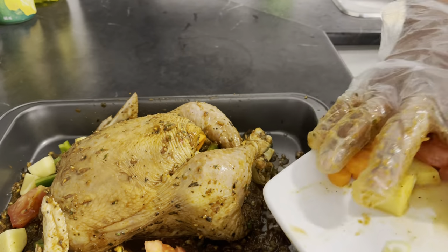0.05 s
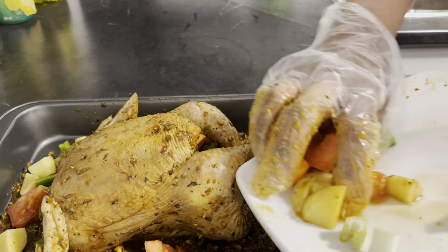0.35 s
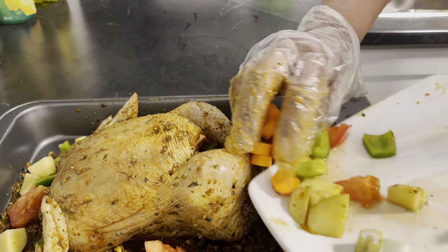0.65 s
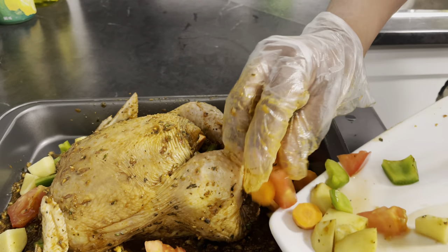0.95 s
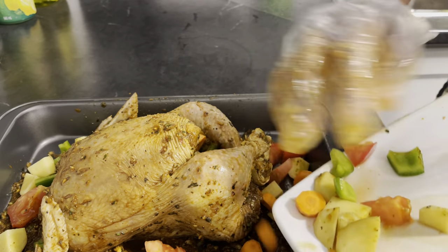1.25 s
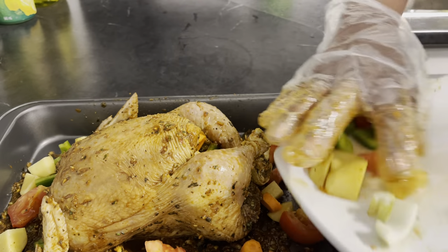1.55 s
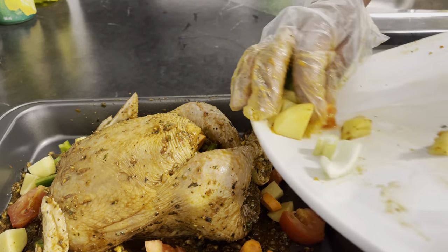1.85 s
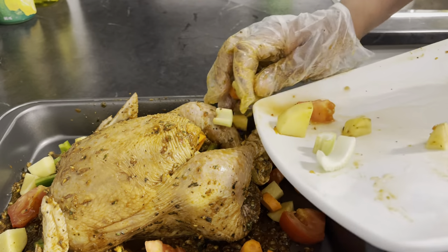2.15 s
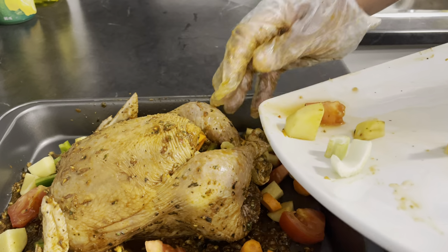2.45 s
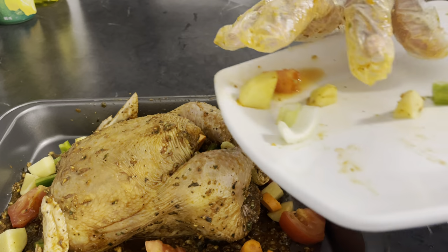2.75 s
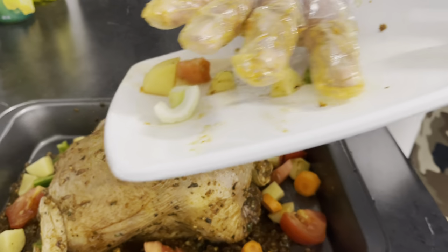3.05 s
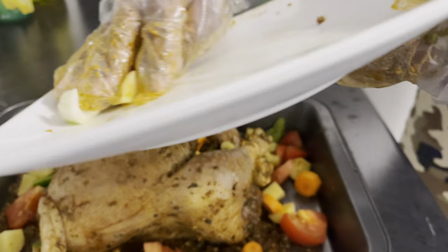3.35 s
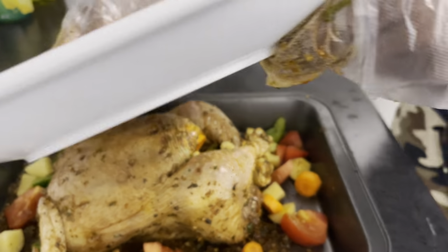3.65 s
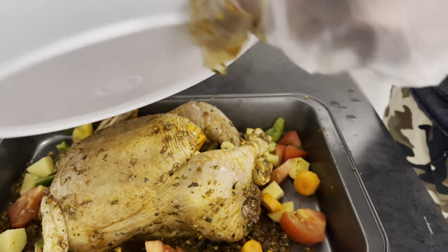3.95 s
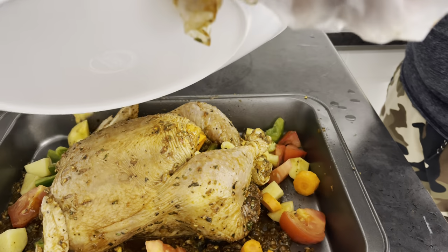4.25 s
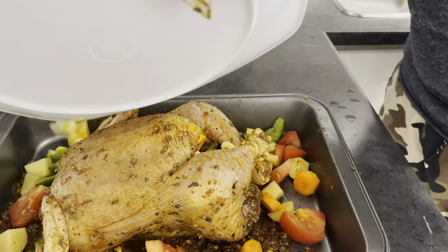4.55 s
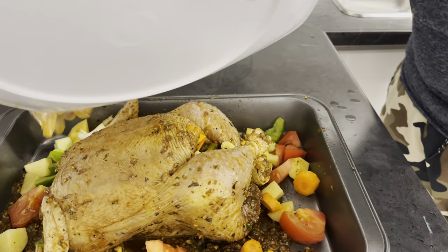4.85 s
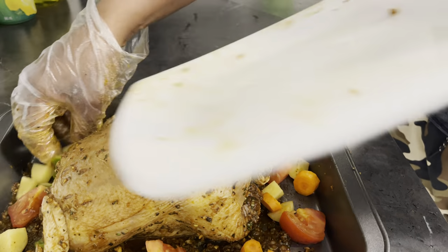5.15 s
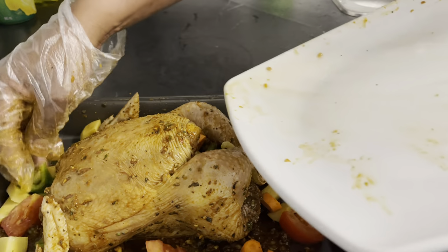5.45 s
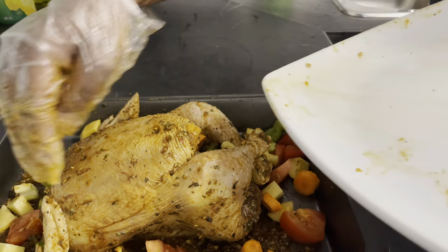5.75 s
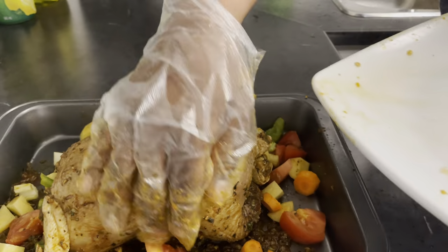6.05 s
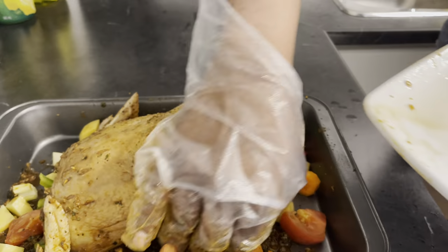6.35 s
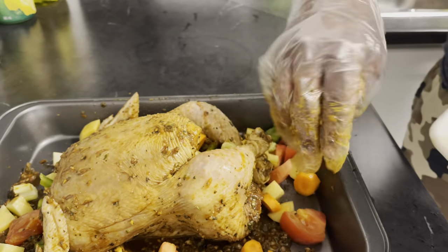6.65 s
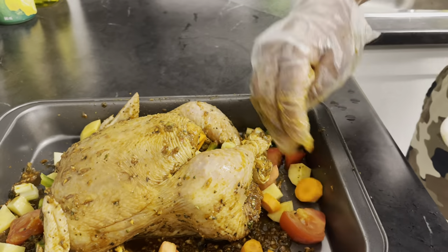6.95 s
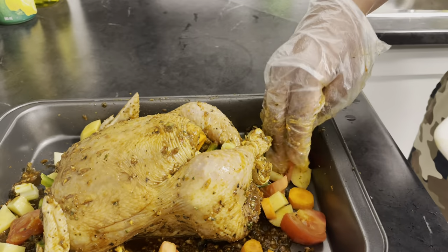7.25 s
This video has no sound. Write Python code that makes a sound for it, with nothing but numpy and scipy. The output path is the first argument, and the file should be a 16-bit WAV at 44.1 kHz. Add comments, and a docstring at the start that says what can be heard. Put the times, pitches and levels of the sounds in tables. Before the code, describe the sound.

Vegetable pieces tap and plop into a loaded metal pan, with a rustling plastic glove, a refrigerator hum and a rushing fan.

```python
"""A hand in a thin plastic glove crinkles throughout, over refrigeration hum and a rushing fan.
From 0.5 to 2.2 s it pushes chopped vegetables off a plate into a metal roasting pan:
each piece lands with a damp knock and a slap, and briefly rings the loaded pan.
Wet fingers drag and the film peels off with small smacks. Near 4 s comes a run of dull bumps
as pieces shift and the pan is nudged; a last few follow near 7 s."""
import sys
import numpy as np
from scipy import signal
from scipy.fft import rfft, irfft
from scipy.io import wavfile

SR = 44100
rng = np.random.default_rng(int(sys.argv[2]) if len(sys.argv) > 2 else 0)


def store_wav(level_fs):
    """Save 16-bit WAV to argv[1]."""
    pcm = np.round(np.clip(np.atleast_2d(level_fs), -1, 1) * 32767)
    wavfile.write(sys.argv[1], SR, pcm.T.astype(np.int16))


N = 326781
TIME, FREQ = np.arange(N) / SR, np.fft.rfftfreq(N, 1 / SR)


def vegetables(rise_cycles=0.33, ring_db=-2, slap_db=3, slap_decay_s=0.012, room_db=-10, softness=5):
    """Each contact gives a damp knock, a wet slap and a pan ring that depends on the spot hit."""
    # modes of the loaded pan: freq_hz, relative_db, t60_s
    pan_modes = [(437, 18.5, 0.04), (711, -6, 0.1), (870, 12, 0.13), (1074, -5, 0.22), (1168, 1, 0.45),
                 (1230, -2, .16), (1370, -15, 0.12), (1406, 8, 0.12), (1600, 4, 0.08), (1778, -5, 0.095),
                 (2090, 1, 0.058), (2140, 8, 0.09), (2350, -11, 0.1), (2570, -2, .07)]
    # spectrum of a wet slap on metal: freq_hz, relative_db
    slap_spectrum = [(60, -13), (200, -8), (500, 6), (1000, 4.5), (1600, 0.5), (2300, -2), (3200, -5),
                     (4000, -11), (5200, 3), (9000, -26)]
    t = TIME[:SR // 2]
    bins_hz = np.fft.rfftfreq(len(t), 1 / SR)
    mode_hz, mode_db, mode_t60_s = np.transpose(pan_modes)[:, :, None]
    mode_gain = amp(mode_db) / np.linalg.norm(amp(mode_db))
    modes = mode_gain * np.exp((2j * np.pi * mode_hz - np.log(1000) / mode_t60_s) * t)
    slap_colour = unit(amp(read(slap_spectrum, bins_hz)))
    lag_s = np.array([[0], [.0002]])  # left, right
    dry = np.zeros((2, N))
    for start_s, knock_db, pitch_hz, t60_s, clack_db, top_hz, balance_db in contacts():
        swell = (1 - np.exp(-t * pitch_hz / rise_cycles)) ** 2 * np.exp(-np.log(1000) * t / t60_s)
        knock = amp(knock_db) * swell / swell.max() * np.sin(2 * np.pi * pitch_hz * (t - lag_s))
        spot = np.exp(2j * np.pi * rng.random((2, len(pan_modes))))
        spot /= np.hypot(1, (mode_hz.T / top_hz) ** softness)  # soft flesh excites little above top_hz
        ring = amp(ring_db) * (spot @ modes).real
        splat = rfft(rng.standard_normal((2, len(t)))) * slap_colour
        splat /= np.hypot(1, (bins_hz / top_hz) ** softness)
        slap = amp(slap_db) * irfft(splat, len(t)) * np.exp(-t / slap_decay_s)
        clack = amp(clack_db) * (ring + slap) * (1 - np.exp(-t * top_hz))
        add(dry, start_s, sides(balance_db) * (knock + clack))
    return dry + amp(room_db) * room(dry)


def contacts(flop_s=.012, flop_db=-24, flop_ratio=0.56, bump_t60_s=0.051, bump_balance_db=3.5):
    """Every touch on the pan: pieces land, then flop over softer and lower; bumps barely stir it."""
    # pieces landing: start_s, knock_db, pitch_hz, t60_s, clack_db, top_hz, left_right_db
    landings = [ (.4583, -33, 2280, 0.016, -23, 3300, -1), (0.4607, -29, 2680, .016, -31, 4400, -4),
                (0.4584, -18, 1350, 0.022, -25.5, 2400, 6), (.461, -15.5, 843, 0.045, -37, 2200, 9.5),
                (0.4644, -19.5, 1760, 0.025, -28, 2800, 4), (.4765, -38, 595, 0.029, -42, 2500, -2),
                (.548, -23.5, 530, 0.025, -34, 1200, 4), (.661, -35, 870, 0.043, -31, 1000, 10),
                (.6775, -21, 1320, .035, -22.5, 2000, 4.5), (.678, -27, 2070, 0.021, -30.5, 2450, 4),
                (.6815, -24, 900, 0.037, -35, 1186, 6), (.722, -27, 903, 0.045, -38, 1300, 8),
                (.733, -18.5, 886, 0.067, -30, 1300, -2), (0.7357, -27, 1123, 0.055, -32.5, 1570, 3),
                (.773, -39, 1060, 0.054, -39, 1700, 5), (.957, -41, 930, .047, -39, 1604, 3),
                (1.1743, -21.5, 1179, 0.095, -35, 1250, 2), (1.176, -36.5, 2370, .018, -49, 2600, 20),
                (1.178, -21.5, 660, .04, -32, 1050, 6), (1.1805, -19, 854, 0.03, -27, 1180, 6),
                (1.229, -29.5, 940, 0.026, -32, 1200, 10), (1.2378, -25, 574, 0.016, -53, 1200, 8),
                (1.479, -37, 595, 0.056, -40, 1610, 6), (2.129, -28, 433, 0.049, -47, 900, 5),
                (2.146, -36, 2510, .024, -38, 3200, 10), (2.1479, -25.5, 570, 0.043, -28.5, 1410, 2),
                (2.148, -33, 1370, 0.028, -44, 1600, 2), (2.166, -32, 800, 0.032, -41, 1700, 3),
                (2.2065, -37, 790, 0.014, -36, 1500, 0), (2.2155, -27.5, 610, 0.022, -52, 1500, 0),
                (4.086, -35, 392, 0.15, -39, 1290, 6), (4.097, -52, 1200, 0.031, -46, 1300, 0)]
    # pieces shifting, hand and plate nudging the pan: start_s, level_db, pitch_hz
    bumps = [ (0.475, -25, 190), (.557, -28.5, 324), (0.584, -30.5, 62), (0.68, -24, 197), (0.705, -36, 64),
             (1.185, -31, 394), (1.248, -30, 196), (1.855, -40, 80), (2.136, -30, 198), (2.17, -33, 218),
             (2.225, -31, 428), (3.841, -24.5, 166), (3.862, -26.5, 191), (3.882, -32.5, 585),
             (3.891, -19.5, 196), (3.905, -33, 363), (3.948, -28, 198), (3.98, -29, 205), (4.056, -39, 400),
             (4.206, -38, 390), (4.545, -31.5, 455), (4.549, -25.5, 203), (5.235, -36.5, 214),
             (7.024, -35, 452), (7.05, -25, 322), (7.054, -21, 190), (7.081, -31, 300)]
    for start_s, knock_db, pitch_hz, t60_s, clack_db, top_hz, balance_db in landings:
        yield start_s, knock_db, pitch_hz, t60_s, clack_db, top_hz, balance_db
        yield (start_s + flop_s, knock_db + flop_db, pitch_hz * flop_ratio, t60_s,
               clack_db + flop_db, top_hz * flop_ratio, balance_db)
    for start_s, level_db, pitch_hz in bumps:
        clack_db, top_hz = level_db - 4, pitch_hz * 2.04
        yield start_s, level_db, pitch_hz, bump_t60_s, clack_db, top_hz, bump_balance_db


def glove(gain_db=2, creases_per_s=5000, spread_db=3, wash=0.9,
          folds_per_s=250, fold_decay_s=0.006, clumping=0.26, crossover_hz=7000):
    """Wet film rubs softly while tiny creases buckle in clumps; a few snap loudly."""
    # single creases snapping over: start_s, drive_db
    snaps = [(.251, -17), (.784, -17), (1.149, -15), (1.319, -17), (2.390, -19), (2.492, -13.5),
             (3.011, -18), (3.196, -17), (3.567, -19), (3.694, -17), (4.103, -16), (4.914, -15),
             (5.450, -18), (5.761, -17), (5.783, -16), (5.941, -13), (6.465, -16), (6.904, -18),
             (7.307, -18)]
    # spectrum of the film: freq_hz, relative_db
    film_spectrum = [(500, -17), (1500, -6.5), (2100, -5), (2600, -4), (3100, -4.5), (4000, -7.5),
                     (5800, -4.5), (7200, -6.5), (8500, -6), (9400, 0.5), (11200, 4), (12400, -6),
                     (13200, -32), (13800, -21), (15800, -31)]
    # film's stereo balance: freq_hz, left_right_db
    film_balance = [(2000, 0.5), (4000, 3), (5800, 9), (7100, 4), (7900, 3.5), (9000, 0)]
    # film's left-right likeness: freq_hz, correlation
    film_likeness = [(2000, 0.13), (7000, 0.027), (8300, 0.74), (8800, 1), (10200, 1), (11200, 1),
                     (13000, 1)]
    # lag of the left channel: freq_hz, lag_cycles
    left_lag = [(8700, 0.028), (9800, 0.47), (10350, 0.55), (11800, 0.92)]
    work_db, crisp_db = glove_work()
    effort, tilt = amp(work_db + gain_db), amp(crisp_db / 2)
    sizes = amp(spread_db * np.minimum(rng.exponential(1, (2, N)), 5))
    creases = unit(sizes * rng.choice([-1, 1], (2, N)) * (rng.random((2, N)) < creases_per_s / SR))
    # a fold giving way sets off a dying run of creases
    folds = rng.exponential(1, N) * (rng.random(N) < folds_per_s / SR)
    runs = signal.lfilter([1], [1, -np.exp(-1 / (fold_decay_s * SR))], folds)
    clumps = unit(1 + clumping * runs)
    crinkle = unit(creases + wash * rng.standard_normal((2, N))) * clumps * effort * tilt
    rub = rng.standard_normal((2, N)) * np.sqrt(clumps) * effort / tilt
    for start_s, drive_db in snaps:
        add(crinkle, start_s, amp(drive_db) * np.array([[1], [.5]]))
    rub_share = 1 / (1 + (FREQ / crossover_hz) ** 4)
    spectrum = stereo_spectra(rub, film_likeness) * np.sqrt(rub_share)
    spectrum += stereo_spectra(crinkle, film_likeness) * np.sqrt(1 - rub_share)
    spectrum *= unit(amp(read(film_spectrum, FREQ))) * sides(read(film_balance, FREQ))
    spectrum[0] *= np.exp(-2j * np.pi * read(left_lag, FREQ))
    return irfft(spectrum, N)


def glove_work(fidget_hz=26, fidget_db=1, rest_db=-3.5, idle_crisp_db=-0.6):
    """The hand's effort on the film and its crispness (crinkle over rub), both in dB."""
    # steady handling: time_s, effort_db
    grip = [(0, -41.5), (.85, -43), (1, -45), (1.5, -43), (2, -44), (2.2, -46.5), (3.1, -45.5), (3.35, -45),
            (4.25, -44.5), (4.55, -49), (5.1, -44.5), (6.8, -46.5), (7.1, -47.5), (7.41, -47.5)]
    # hand holding still: start_s, length_s
    rests = [(1.345, 0.046), (2.07, 0.16), (4.492, 0.058), (5.62, 0.16), (6.902, 0.096)]
    # fingers flexing or sweeping: start_s, length_s, effort_db, crisp_db
    strokes = [ (1.086, 0.13, -43, 2.5), (1.197, 0.11, -41, 3), (1.38, 0.048, -41, -3),
               (1.575, 0.05, -44, -1), (2.718, 0.24, -42.5, 1), (3.167, 0.083, -43, 2),
               (3.213, 0.31, -44, 0.5), (4.717, .04, -48, 1), (4.907, 0.045, -45.5, 8),
               (4.983, 0.13, -45.5, -0.5), (5.394, 0.12, -43.5, 2), (5.746, .06, -59, 5),
               (5.854, 0.085, -45, 7), (5.967, 0.087, -40.5, 4.5), (6.037, 0.073, -46, 0),
               (6.21, 0.088, -42, -1.5), (6.404, 0.23, -47.5, 2.5), (6.662, 0.15, -43.5, -0.5),
               (6.976, 0.079, -42, 0), (7.265, 0.064, -46, -1)]
    grip_db = np.interp(TIME, *np.transpose(grip)) + fidget_db * drift(fidget_hz)
    stillness = sum(movement(*rest) for rest in rests)
    power = amp(grip_db + rest_db * stillness) ** 2
    crisp_db = np.full(N, idle_crisp_db)
    for start_s, length_s, effort_db, stroke_crisp_db in strokes:
        swell = movement(start_s, length_s)
        power += amp(effort_db) ** 2 * swell
        crisp_db += (stroke_crisp_db - crisp_db) * swell
    return 10 * np.log10(power), crisp_db


def movement(start_s, length_s, taper_share=0.52):
    """Envelope of one hand movement, 0 to 1: swell, hold, fade."""
    edge = np.minimum(TIME - start_s, start_s + length_s - TIME) / (taper_share * length_s / 2)
    return np.sin(np.pi / 2 * np.clip(edge, 0, 1)) ** 2


def smacks(width_hz=4200, rise_s=0.00052, decay_s=0.0066, spread_db=4, balance_db=5):
    """Wet film peels off food and skin in a quickly dying run of tiny pops."""
    # wet patches letting go: start_s, level_db, centre_hz
    peels = [(.282, -42, 4500), (1.537, -44, 5000), (1.703, -41, 5000), (2.491, -46, 5000),
             (3.418, -43, 5000), (5.447, -41, 4800), (2.564, -44, 4500), (4.068, -45, 4500),
             (4.488, -42.5, 4500), (4.752, -42, 4500), (5.271, -43, 4500), (6.463, -43, 4500),
             (7.204, -45, 4600), (7.304, -45, 5000)]
    out, t = np.zeros((2, N)), TIME[:SR // 20]
    bins_hz = np.fft.rfftfreq(len(t), 1 / SR)
    swell = (1 - np.exp(-t / rise_s)) * np.exp(-t / decay_s)
    for start_s, level_db, centre_hz in peels:
        pops = rng.standard_normal((2, len(t)))
        pops *= amp(spread_db * np.minimum(rng.exponential(1, len(t)), 4))
        wet = unit(irfft(rfft(pops) * resonance(bins_hz, centre_hz, width_hz), len(t)))
        add(out, start_s, amp(level_db) * sides(balance_db) * wet * swell / swell.max())
    return out


def wipes():
    """Wet fingers drag over plate and pan: friction noise in one resonance of the surface."""
    # finger drags: start_s, length_s, level_db, centre_hz, width_hz
    drags = [(1.37, 0.07, -49, 1700, 1300), (1.67, 0.093, -51, 1700, 1200), (2.722, 0.2, -51, 1920, 1000),
             (3.178, 0.26, -52.5, 1310, 190), (6.201, .1, -52, 1600, 1100), (6.683, 0.23, -54, 2600, 560),
             (6.996, 0.1, -47.5, 1400, 1000)]
    out = np.zeros((2, N))
    for start_s, length_s, level_db, centre_hz, width_hz in drags:
        size = round(length_s * SR)
        surface = resonance(np.fft.rfftfreq(size, 1 / SR), centre_hz, width_hz)
        friction = irfft(rfft(rng.standard_normal((2, size))) * surface, size)
        add(out, start_s, amp(level_db) * unit(friction) * signal.windows.tukey(size, .8))
    return out


def fridge_hum(waver_hz=4.0):
    """Refrigeration motor tones that waver in strength and phase."""
    # motor tones: freq_hz, level_db, left_right_db, unsteadiness
    tones = [(60.2, -71.5, 4, 0), (91.8, -61, 4, 0.4), (111.5, -55, 0, 0.05), (119.96, -36.5, 4, 0.06),
             (147.8, -42.5, 4.5, 0.29), (140, -48.5, 3.5, 0.74), (177, -58, 11, 1), (363, -60, -11, 0),
             (411, -63.5, 6, 0.96), (525.6, -68, 20.5, 0.3)]
    out = np.zeros((2, N))
    for freq_hz, level_db, balance_db, unsteadiness in tones:
        waver = 1 + unsteadiness * (drift(waver_hz) + 1j * drift(waver_hz))
        tone = (waver * np.exp(2j * np.pi * freq_hz * TIME)).real
        out += amp(level_db) * sides(balance_db) * unit(tone)
    return out


def fan(level_db=-40.5):
    """Rushing air, coloured by the duct and the room."""
    # spectrum of the air: freq_hz, relative_db
    air_spectrum = [(20, -26), (36, -6), (50, 1), (100, 9), (190, 1.5), (280, -3), (450, -1), (700, -7.5),
                    (1100, -13), (1700, -19), (2500, -29), (4000, -18.5), (9000, -23.5), (15000, -100)]
    # duct and room peaks and dips: centre_hz, width_hz, lift_db
    duct = [(219, 9.6, -18), (247, 29, 5.5), (441, 53, -4.5), (477, 61, 3), (849, 97, 19), (936, 43, 10.5),
            (1250, 170, -3.5), (1280, 52, -3), (1567, 116, 8.5), (1705, 27, 12.5), (2330, 200, 15.5),
            (2600, 52, 9)]
    # air's left-right likeness: freq_hz, correlation
    air_likeness = [(30, .98), (160, 0.37), (300, 0.63), (500, 0.066), (850, 0.38), (1200, 0), (4000, 0.03)]
    # air's stereo balance: freq_hz, left_right_db
    air_balance = [(50, 8), (180, 0.5), (380, -2), (540, 4), (800, -1), (1200, 2.5), (4000, 3.5)]
    duct_db = sum(lift_db * resonance(FREQ, hz, width_hz) for hz, width_hz, lift_db in duct)
    spectrum = stereo_spectra(rng.standard_normal((2, N)), air_likeness)
    spectrum *= amp(read(air_spectrum, FREQ) + duct_db) * sides(read(air_balance, FREQ))
    return amp(level_db) * unit(irfft(spectrum, N))


def room(x, gap_s=0.005):
    """Sparse reflections off steel and tile, each band dying at its own rate."""
    # kitchen decay: freq_hz, t60_s
    decay_times = [(150, 0.78), (600, 0.23), (1300, 0.6), (3000, 0.38), (10000, 0.11)]
    size = SR * 3 // 4
    taps = rng.standard_normal((2, size)) * (rng.random((2, size)) < .06) * (TIME[:size] > gap_s)
    band_hz, t, bands = signal.stft(taps, SR, nperseg=256)
    decay = np.exp(-np.log(1000) * t / read(decay_times, band_hz)[:, None])
    tail = signal.istft(bands * decay, SR, nperseg=256)[1]
    return signal.fftconvolve(x, tail / np.linalg.norm(tail[0]), axes=1)[:, :N]


def amp(db):
    """Decibels to gain."""
    return 10 ** (np.asarray(db) / 20)


def unit(x):
    """Scale to rms 1."""
    return x / np.sqrt(np.mean(x ** 2) + 1e-20)


def read(points, hz):
    """Interpolate (freq_hz, value) rows on a log-frequency axis."""
    point_hz, value = np.transpose(points)
    return np.interp(np.log(hz + 1), np.log(point_hz + 1), value)


def resonance(hz, centre_hz, width_hz):
    """Peak of height 1, width_hz wide at half height."""
    return 1 / (1 + (2 * (hz - centre_hz) / width_hz) ** 2)


def sides(db):
    """Left and right gains for a level difference."""
    return amp(np.array([np.atleast_1d(db), -np.atleast_1d(db)]) / 2)


def add(mix, start_s, sound):
    """Mix a sound in at start_s."""
    part = mix[:, max(round(start_s * SR), 0):][:, :sound.shape[1]]
    part += sound[:, :part.shape[1]]


def drift(rate_hz):
    """Slow random wander, rms 1."""
    return unit(irfft(rfft(rng.standard_normal(N)) * np.exp(-(FREQ / rate_hz) ** 2), N))


def stereo_spectra(x, likeness):
    """Blend two unrelated signals into left and right spectra of a given correlation."""
    mid, side = rfft(x)
    correlation = np.clip(read(likeness, FREQ), -1, 1)
    mid *= np.sqrt((1 + correlation) / 2)
    side *= np.sqrt((1 - correlation) / 2)
    return np.array([mid + side, mid - side])


def scene(hand_room_db=-14):
    """Vegetables and glove close by, machines behind."""
    hand = glove() + wipes() + smacks()
    return vegetables() + hand + amp(hand_room_db) * room(hand) + fridge_hum() + fan()


def record(dry):
    """Bass cut at 38.5 Hz, band limit at 15.8 kHz."""
    highpass = signal.butter(4, 38.5, "highpass", fs=SR, output="sos")
    lowpass = signal.firwin(511, 15800, window=("kaiser", 9), fs=SR)
    return signal.oaconvolve(signal.sosfilt(highpass, dry), lowpass[None], "same")


dry = scene()
out = record(dry)
store_wav(out)
```